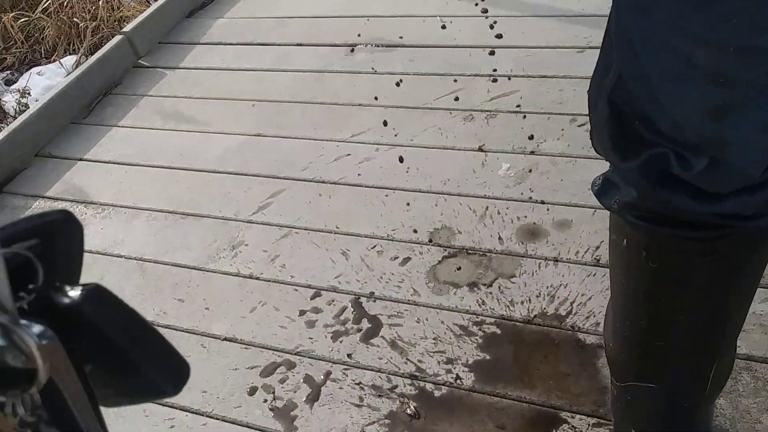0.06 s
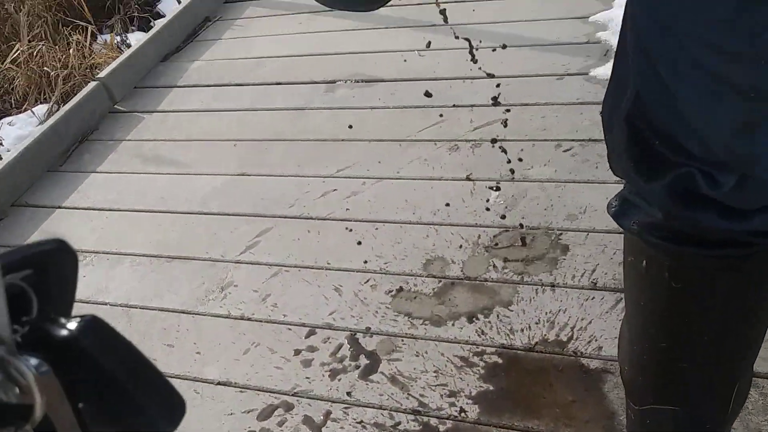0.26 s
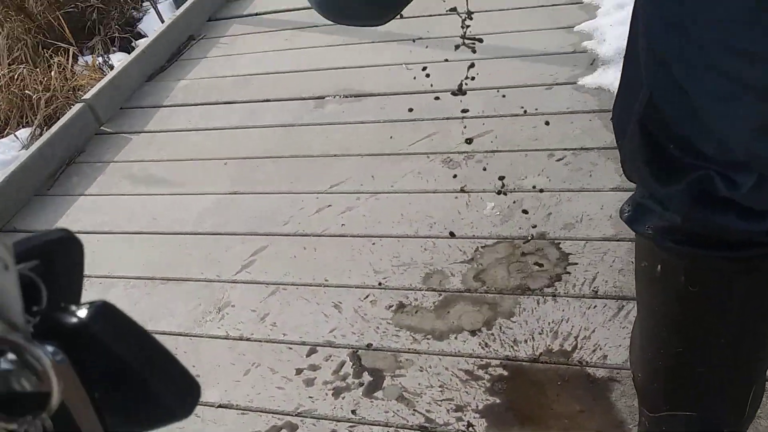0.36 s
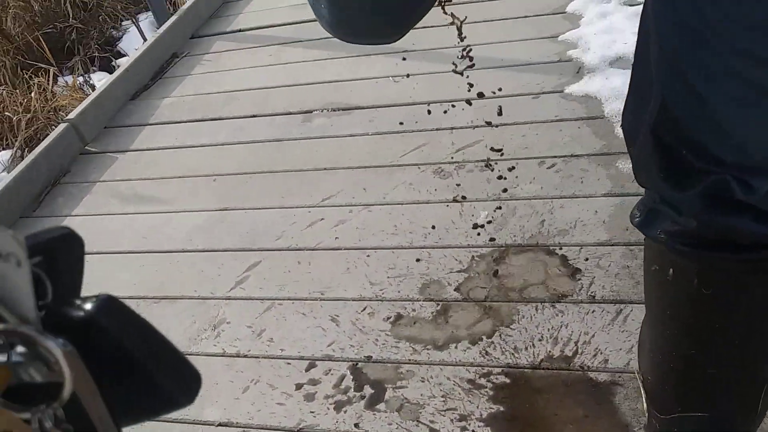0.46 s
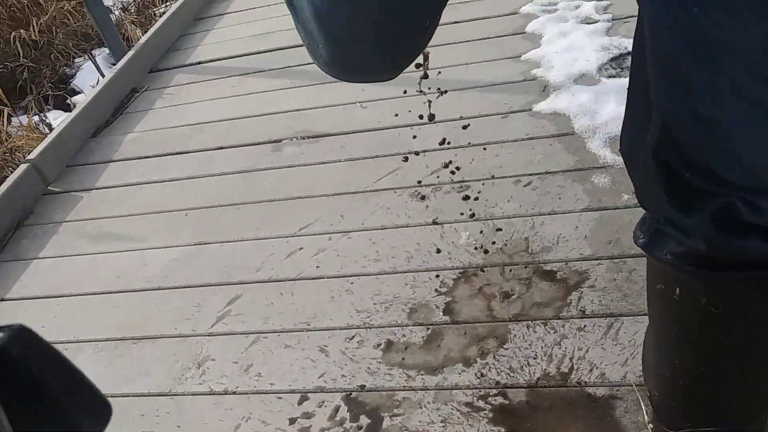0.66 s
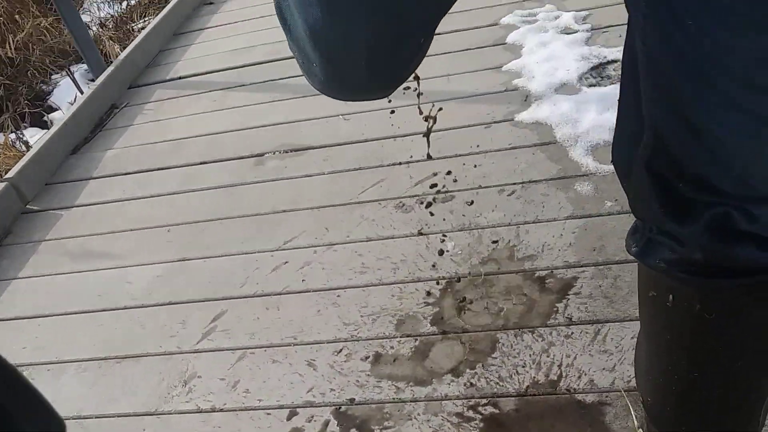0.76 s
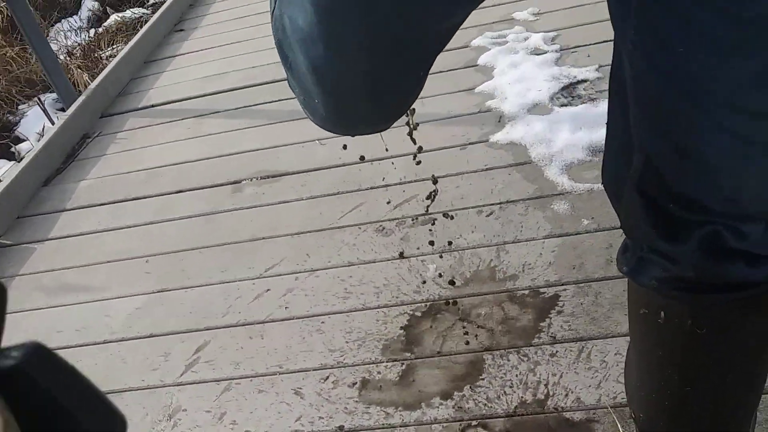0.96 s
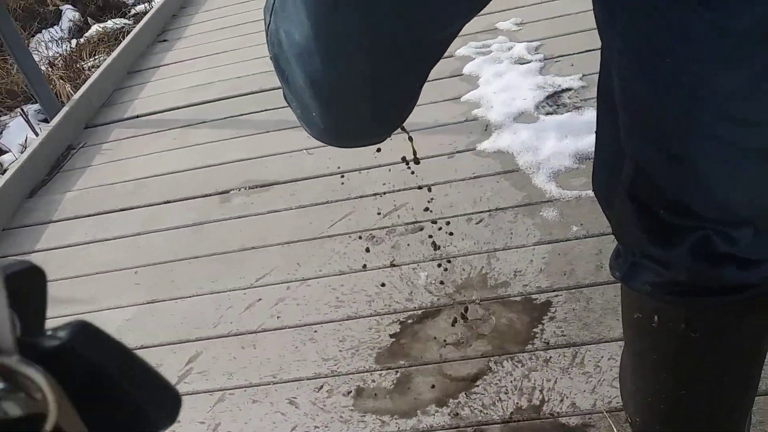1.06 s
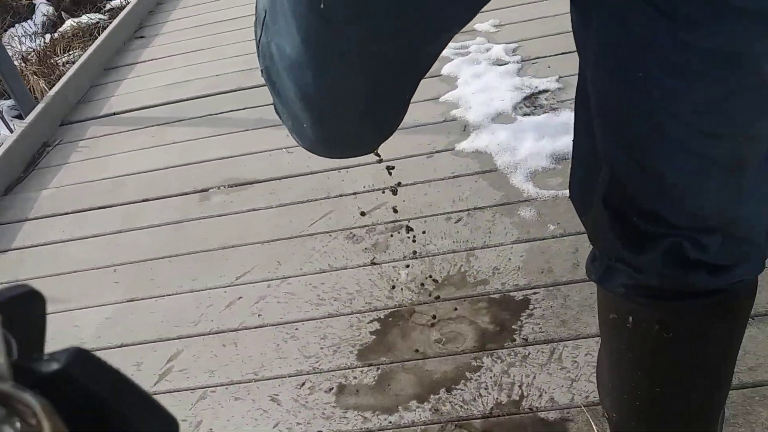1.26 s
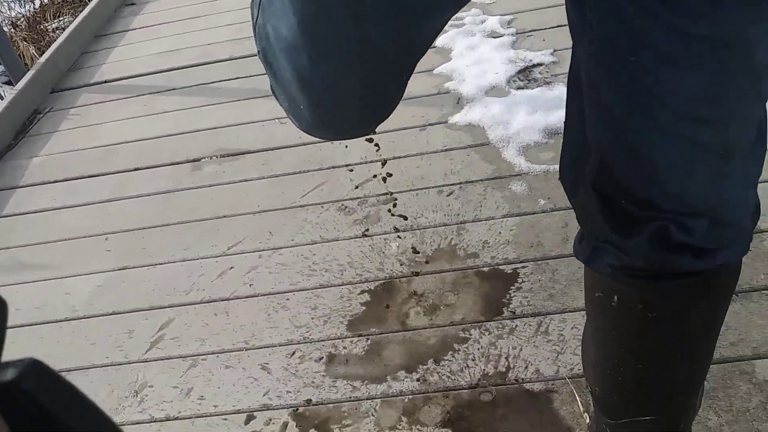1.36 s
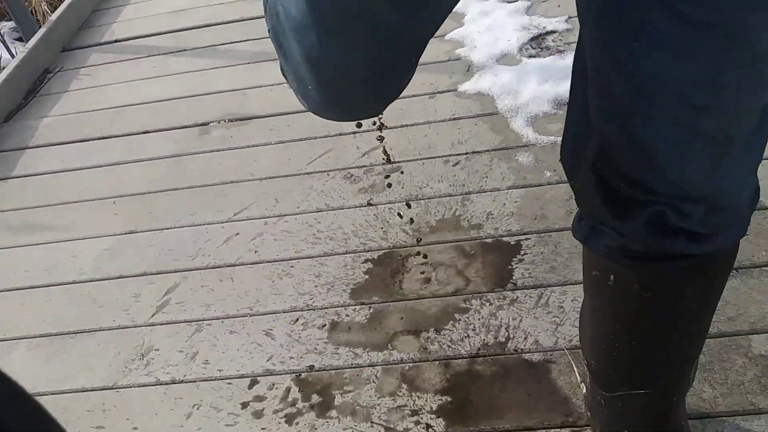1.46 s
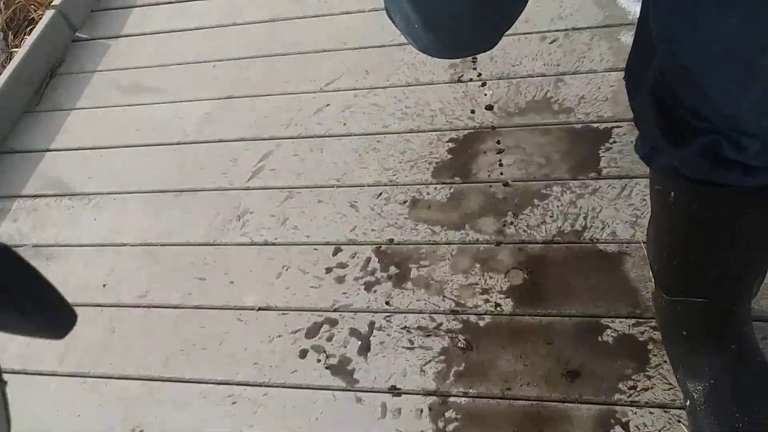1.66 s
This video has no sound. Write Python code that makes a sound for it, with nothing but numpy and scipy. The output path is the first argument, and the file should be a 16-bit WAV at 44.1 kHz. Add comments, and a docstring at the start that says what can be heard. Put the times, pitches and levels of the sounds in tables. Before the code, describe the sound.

Water dripping and splattering from a lifted boot onto wet wooden boardwalk planks.

```python
"""On a wet wooden boardwalk, water runs off a lifted boot and lands a metre or so away.
Each drop is a slap of a few cycles (big drops lower), then a splash as it spreads; fine spray ticks
in between. The planks ring, and planks and legs scatter the sound briefly. Faint wind and
far-off tones fill the open air, with one soft low bump near the end."""
import sys
import numpy as np
from scipy import signal
from scipy.fft import rfft, irfft
from scipy.io import wavfile
from scipy.ndimage import uniform_filter1d

SR = 44100
rng = np.random.default_rng(int(sys.argv[2]) if len(sys.argv) > 2 else 0)


def store_wav(level_fs):
    """Save 16-bit WAV to argv[1]."""
    pcm = np.round(np.clip(np.atleast_2d(level_fs), -1, 1) * 32767)
    wavfile.write(sys.argv[1], SR, pcm.T.astype(np.int16))


N = 74970

# Drops on the planks: start_s, pitch_hz, level_db, length_cycles, splash_db (relative to the slap)
DROP_HITS = [(0.0923, 4200, -23.5, 1.15, 2.5), (0.1328, 4120, -35, 1.45, 3), (0.1906, 6800, -26, 2.9, -28),
             (0.206, 5000, -21.5, 2.9, -3.5), (0.2561, 6000, -27, 2.9, -25), (0.2797, 4160, -22.0, 2.9, -8),
             (0.2909, 5260, -24, 3.9, -19), (0.3088, 5860, -12.5, 2.34, -13), (0.3308, 7300, -30, 2.3, -4),
             (0.3489, 4960, -24.5, 1.93, -1), (0.3824, 7000, -30.5, 3.3, -15),
             (0.3947, 5700, -29, 3.5, -11), (0.4036, 5800, -29, 3.3, -3), (0.4488, 4340, -27, 3.4, -4),
             (0.4624, 4650, -32, 1.5, 1), (0.4732, 6000, -23.5, 2.65, -13), (0.4767, 4730, -19, 2.13, -3.5),
             (0.4935, 7300, -26.5, 3.1, -26), (0.511, 5000, -25, 3, -10), (0.5313, 5540, -29.5, 2.6, 6.5),
             (0.5349, 5030, -36, 2.7, -12), (0.556, 6160, -31, 1.6, -2), (0.5717, 4560, -21.5, 3, -19),
             (0.5953, 4890, -21, 1.1, -2), (0.6118, 5200, -13.5, 2.5, -6.5), (0.616, 2550, -18, 2.7, 2),
             (0.6436, 6100, -31, 1.8, 8), (0.6496, 3640, -27.5, 2.34, 3.5), (0.6662, 4580, -28.0, 3.7, 3.5),
             (0.6947, 4980, -32, 3.7, -1), (0.7124, 3580, -31, 3.6, -1.5), (0.7384, 5400, -26, 3, -19),
             (0.7458, 3096, -11.5, 2.56, -10.5), (0.7675, 5310, -29, 2.2, -7), (0.785, 6690, -29, 3.3, -16),
             (0.8028, 3950, -23, 0.91, -1), (0.8093, 4350, -14, 1.7, -4), (0.838, 5500, -29, 3, -3),
             (0.8515, 2290, -24.5, 4.1, 1.5), (0.8832, 5200, -27, 2.1, 6), (0.9016, 2190, -9, 2.1, -7),
             (0.9256, 3860, -24.5, 3.2, 0), (0.9466, 5900, -32.5, 3.8, -16), (0.9845, 5000, -30.5, 3.6, -6),
             (1.022, 5270, -27, 2.2, -9), (1.041, 4720, -19.5, 4.1, -14), (1.0767, 5900, -30.5, 3.5, -6),
             (1.0837, 4540, -38, 2.6, 4.5), (1.1093, 5600, -21, 2.12, -1.5), (1.129, 3520, -26, 1.38, 7.5),
             (1.162, 5400, -43, 2, 1), (1.1934, 4040, -29, 2.2, -18), (1.2019, 5300, -31.5, 3.1, 0.5),
             (1.21, 5140, -20.5, 3.02, -8.5), (1.2467, 4450, -35.5, 3.5, 2), (1.2607, 6020, -34, 1.03, 6.5),
             (1.3876, 4970, -17, 3, -12), (1.4222, 3130, -40, 1.2, 9.5), (1.4364, 3970, -34, 2.33, 5.5),
             (1.4634, 5050, -23, 3, -8.5), (1.4863, 3470, -22, 1.94, 4), (1.5026, 7140, -35, 2.2, 1),
             (1.5576, 8000, -37, 2.4, 1), (1.594, 6150, -36, 2.2, 1), (1.6085, 7970, -29, 3.6, -9.5),
             (1.6368, 7260, -36.5, 2.4, 1)]
# Thickness of the fine spray: time_s, droplets_per_s
SPRAY_DENSITY = [(0, 6.7), (.2, 30), (.4, 200), (.7, 118), (1.05, 185), (1.3, 170), (1.45, 20), (1.7, 11)]
# Tone colour of the drops and spray: frequency_hz, gain_db
DROP_EQ = [(150, -25), (600, -12), (1200, -7.5), (2200, 5.5), (2800, 2), (4500, 2), (6500, 0),
           (8200, -7.5), (9500, -8), (11500, -13), (15500, -9.5)]
# Ring of the planks: pitch_hz, t60_s, level_db
PLANK_RINGS = [(2270, .022, -50), (2450, .022, -53), (3150, .022, -54), (4400, .02, -51)]
# Tone colour of the outdoor air: frequency_hz, gain_db
WIND_EQ = [(25, -50), (42, -29), (65, -6), (110, 2), (180, 1), (270, -3), (550, -3), (820, 0.5),
           (1200, -2.5), (1700, -10.5), (2300, -7.5), (3000, -14), (6000, -19), (8300, -29.5),
           (9400, -39.5), (11500, -29.5), (15500, -53)]
# Glide of the far-off rising tone: time_s, pitch_hz
RISING_GLIDE = [(0.94, 481.7), (1.111, 530.6), (1.205, 611)]

TOP_HZ = 16200


def drop(start_s, hz, level_db, cycles, splash_db, noise):
    """A drop slaps wet wood with a softer, lower body, knocks if heavy, then splashes and fizzes."""
    out = slap(hz, cycles)
    slap_strength = np.sqrt(np.sum(out ** 2))
    low_body = undb(-12.5) * slap(hz * 0.81, cycles=2.42)
    add(out, 0, low_body)
    knock_db = 14 + 2.02 * level_db  # relative to the slap: heavy drops knock the board far harder
    add(out, 0, undb(knock_db) * slap(hz * 0.707, cycles=1.56))
    splash = speck_burst(noise[0], hz * 1.091, octaves=0.72, decay_s=0.0019)
    add(out, cycles / hz, slap_strength * undb(splash_db) * splash)
    fizz = speck_burst(noise[1], hz=7000, octaves=0.48, decay_s=0.0022)  # the film tears into droplets
    fizz_db = -6 - 14.5 * start_s  # less fizz as a puddle gathers
    add(out, .5 * cycles / hz, slap_strength * undb(fizz_db) * fizz)
    return undb(level_db) * out


def slap(hz, cycles, steepness=4.37, size=1024):
    """An impact's pressure wave swells and dies within a few cycles."""
    turns = hz * np.arange(size) / SR
    age = turns / cycles * np.sqrt(3)
    swell = (age * np.exp(1 - age)) ** steepness
    return swell * np.sin(2 * np.pi * turns)


def speck_burst(noise, hz, octaves, decay_s, grain=1.87):
    """Spreading water gives a dying puff of noise; grain above 1 breaks it into separate specks."""
    t = np.arange(len(noise)) / SR
    specks = np.sign(noise) * np.abs(noise) ** grain
    attack = np.tanh(2 * t * hz) ** 2
    return unit_energy(band(specks, hz, octaves) * attack * np.exp(-t / decay_s))


def boot_stream():
    """The broken stream from the boot lands drop by drop."""
    out = np.zeros(N)
    for start_s, hz, level_db, cycles, splash_db in DROP_HITS:
        noise = rng.standard_normal((2, 1024))
        add(out, start_s, drop(start_s, hz, level_db, max(cycles, 1), splash_db, noise))
    return out


def spray(candidates=600):
    """Tiny droplets tick down at random, thickest while the stream is strongest."""
    out = np.zeros(N)
    chances = rng.random((candidates, 2))
    spreads = np.clip(rng.standard_normal((candidates, 2)), -2, 2)
    noises = rng.standard_normal((candidates, 2, 512))
    for (position, luck), (louder, higher), noise in zip(chances, spreads, noises):
        start_s = position * N / SR
        droplets_per_s = np.interp(start_s, *np.transpose(SPRAY_DENSITY))
        if luck < droplets_per_s * N / SR / candidates:
            hz = 7100 * 2 ** (0.33 * higher)
            level_db = -47 + 6.5 * louder
            add(out, start_s, drop(start_s, hz, level_db, cycles=2, splash_db=3, noise=noise))
    return out


def boardwalk(water, predelay_s=0.0025, scatter_decay_s=0.0069, tail_decay_s=0.085, size=8192):
    """The planks ring briefly; planks and legs scatter the sound and a faint outdoor tail follows."""
    t = np.arange(size) / SR
    near, far = rng.standard_normal((2, size)) * (t > predelay_s)
    scatter = undb(-15) * unit_energy(near * np.exp(-t / scatter_decay_s))
    tail = undb(-25) * unit_energy(far * np.exp(-t / tail_decay_s))
    response = scatter + tail
    for hz, t60_s, level_db in PLANK_RINGS:
        response += undb(level_db) * np.exp(-np.log(1000) * t / t60_s) * np.cos(2 * np.pi * hz * t)
    return water + signal.fftconvolve(water, response)[:N]


def wind(level_db=-56, gust_depth_db=.3, flicker_depth_db=.8):
    """Faint rumble and distant rush; its octaves swell together and flicker on their own."""
    gust_db = gust_depth_db * wander(2.4)
    air = np.zeros(N)
    for octave in range(10):
        rush = band(rng.standard_normal(N), TOP_HZ / 2 ** octave, octaves=0.67)
        air += rush * undb(gust_db + flicker_depth_db * wander(13.87))
    air = irfft(rfft(air) * eq_gain(WIND_EQ, N), N)
    return undb(level_db) * air / air.std()


def far_whine(level_db=-68.5, centre_hz=879):
    """A distant whine wavers in pitch and level."""
    waver = undb(2 * wander(10.6))
    hz = centre_hz * (1 + 0.026 * wander(12))
    return undb(level_db) * waver * np.sin(2 * np.pi * np.cumsum(hz) / SR)


def far_rising_tone(level_db=-63):
    """A far-off tone flutters and climbs in three swells while its upper octave grows."""
    t = np.arange(N) / SR
    time_s, hz = np.transpose(RISING_GLIDE)
    phase = 2 * np.pi * np.cumsum(np.interp(t, time_s, hz)) / SR
    progress = np.clip((t - time_s[0]) / (time_s[-1] - time_s[0]), 0, 1)
    swells = np.abs(np.sin(3 * np.pi * progress))
    upper_octave = undb(3) * 2 * progress ** 2 * np.sin(2 * phase)
    flutter_db = 3 * wander(40.5)
    return undb(level_db + flutter_db) * swells * (np.sin(phase) + upper_octave)


def undb(db):
    """Decibels to gain."""
    return 10 ** (np.asarray(db) / 20)


def unit_energy(x):
    """Scale to an energy of 1."""
    return x / np.sqrt(np.sum(x ** 2) + 1e-18)


def add(out, start_s, sound):
    """Mix a short sound in at a time."""
    start = max(int(start_s * SR), 0)
    length = max(min(len(sound), len(out) - start), 0)
    out[start:start + length] += sound[:length]


def band(x, hz, octaves):
    """Bell-shaped band-pass on a log-frequency axis."""
    bins_hz = np.maximum(np.fft.rfftfreq(len(x), 1 / SR), 1)
    bell = np.exp(-.5 * (np.log2(bins_hz / hz) / octaves) ** 2)
    return irfft(rfft(x) * bell, len(x))


def wander(rate_hz):
    """Smooth random drift with a spread of 1."""
    hold = int(SR / rate_hz)
    steps = np.repeat(rng.standard_normal(N // hold + 1), hold)
    drift = uniform_filter1d(steps, hold)[:N]
    return drift / drift.std()


def eq_gain(curve, size):
    """Gain of an EQ curve at each FFT bin."""
    hz, gain_db = np.transpose(curve)
    bins_hz = np.maximum(np.fft.rfftfreq(size, 1 / SR), 1)
    return undb(np.interp(np.log(bins_hz), np.log(hz), gain_db))


def colour(x, curve, size=2048):
    """Minimum-phase EQ: nothing rings ahead of a hit."""
    cepstrum = irfft(np.log(eq_gain(curve, size)))
    cepstrum[1:size // 2] *= 2
    cepstrum[size // 2 + 1:] = 0
    response = irfft(np.exp(rfft(cepstrum)))
    return signal.fftconvolve(x, response)[:len(x)]


def scene():
    """Drops and spray up front, wind and far tones behind, and a soft low bump near the end."""
    water = colour(boot_stream() + spray(), DROP_EQ)
    out = boardwalk(water) + wind() + far_whine() + far_rising_tone()
    low_bump = undb(-43) * slap(hz=294, cycles=2.14)
    add(out, start_s=1.6735, sound=low_bump)
    return out[None]


def record(dry):
    """A steep low-pass cuts the top of the treble."""
    return signal.sosfilt(signal.ellip(8, .2, 70, TOP_HZ, fs=SR, output="sos"), dry)


dry = scene()
out = record(dry)
store_wav(out)
```